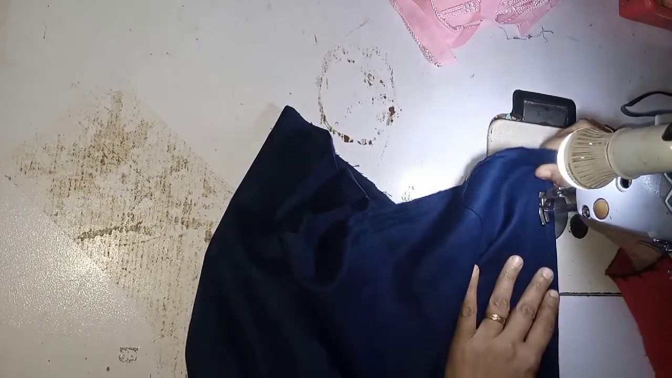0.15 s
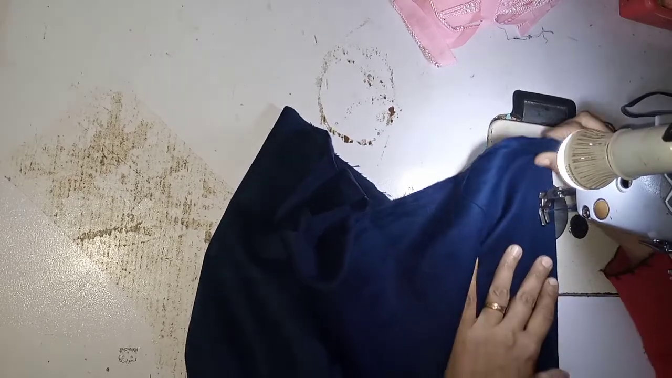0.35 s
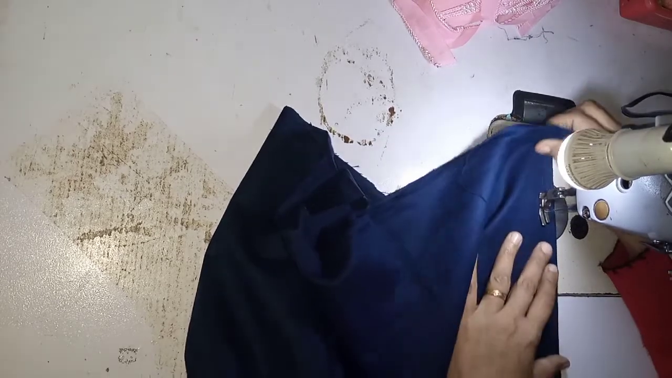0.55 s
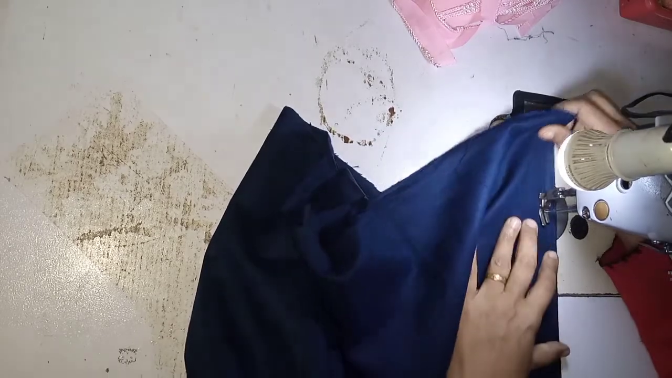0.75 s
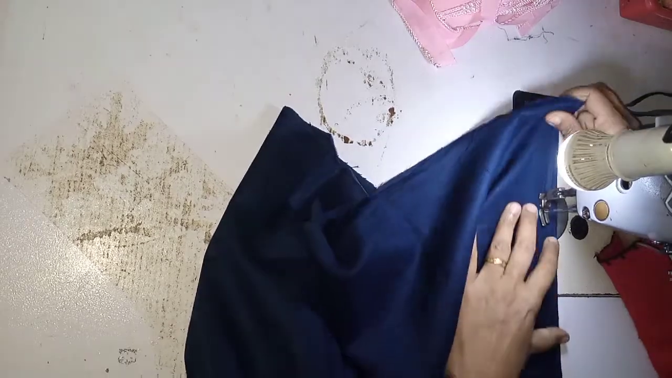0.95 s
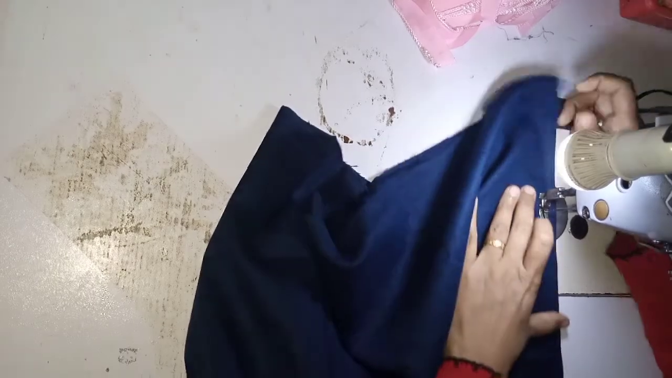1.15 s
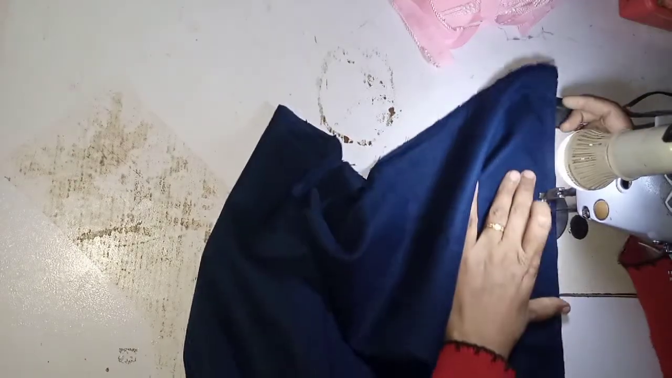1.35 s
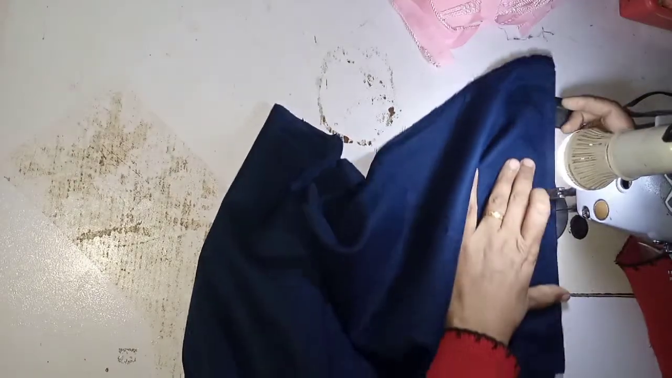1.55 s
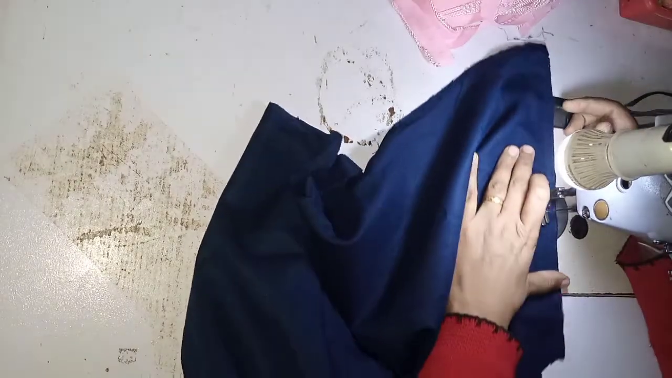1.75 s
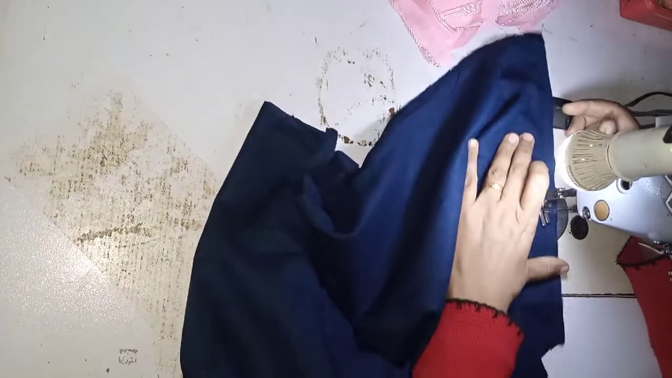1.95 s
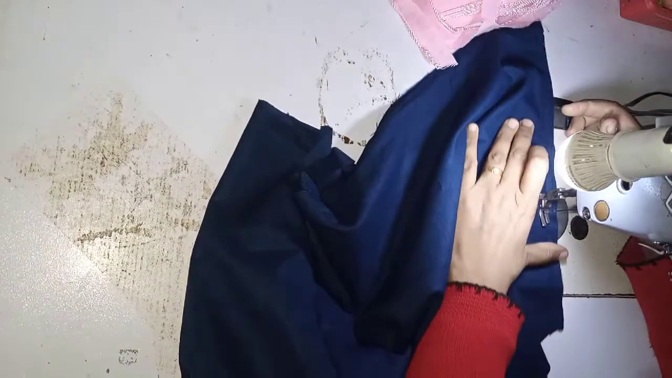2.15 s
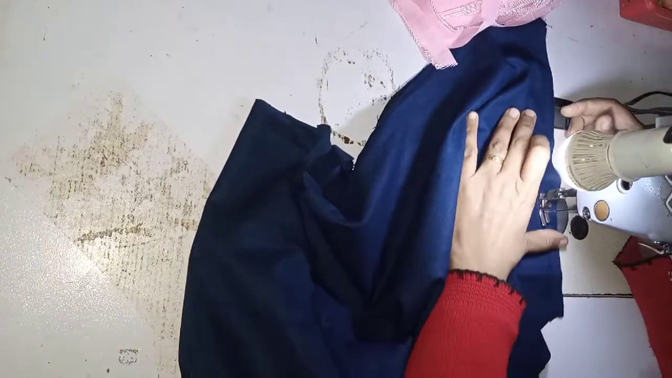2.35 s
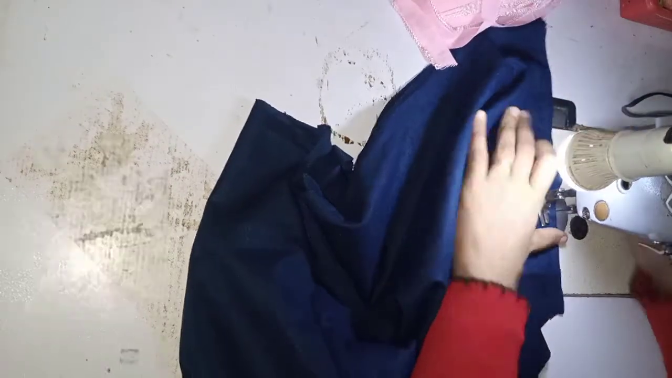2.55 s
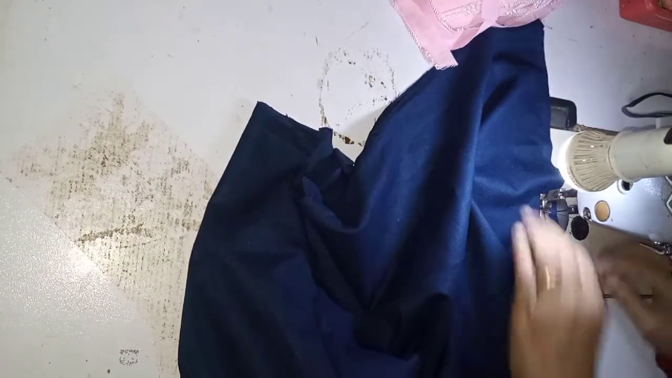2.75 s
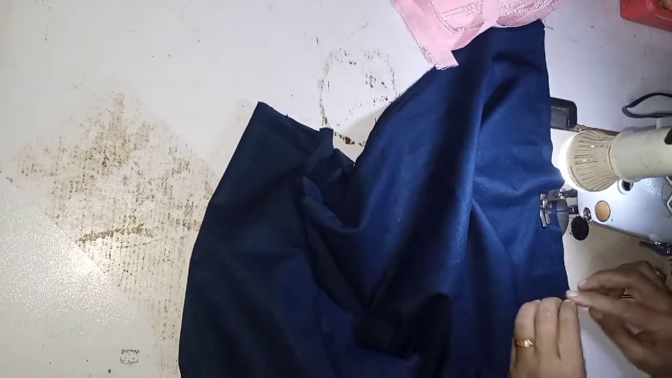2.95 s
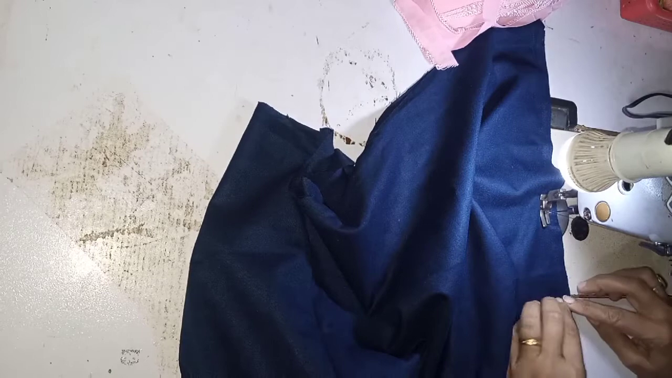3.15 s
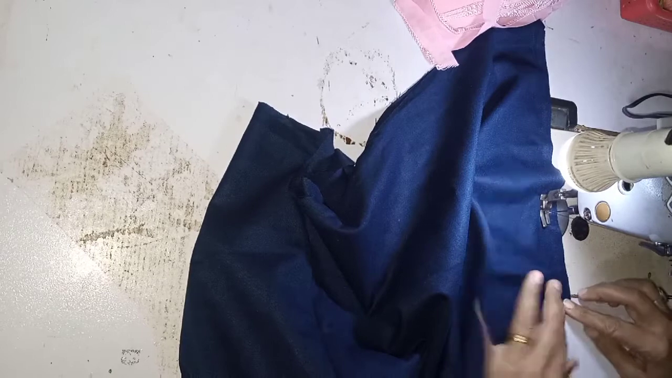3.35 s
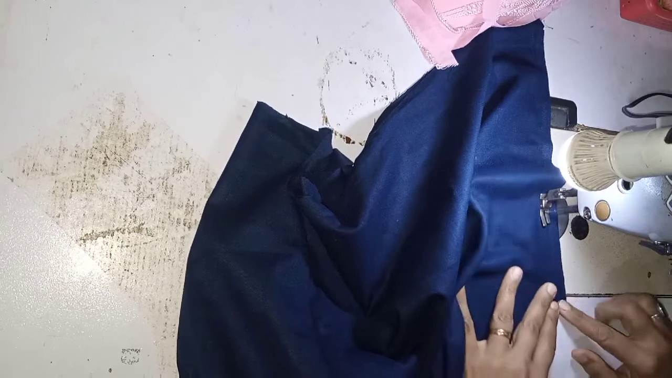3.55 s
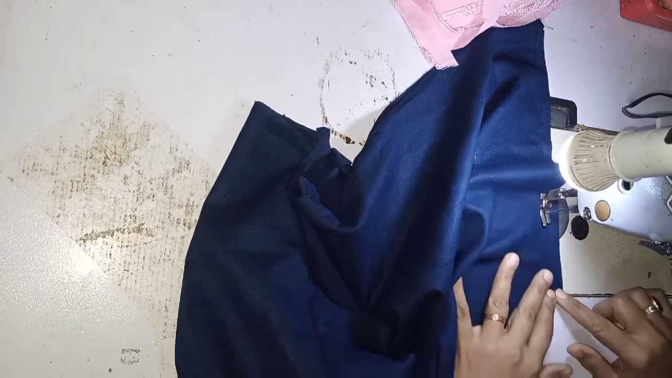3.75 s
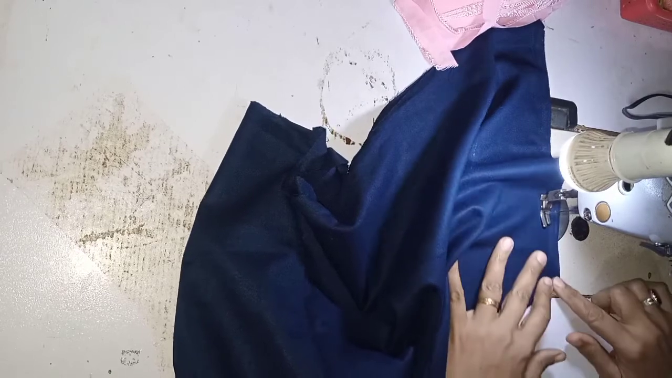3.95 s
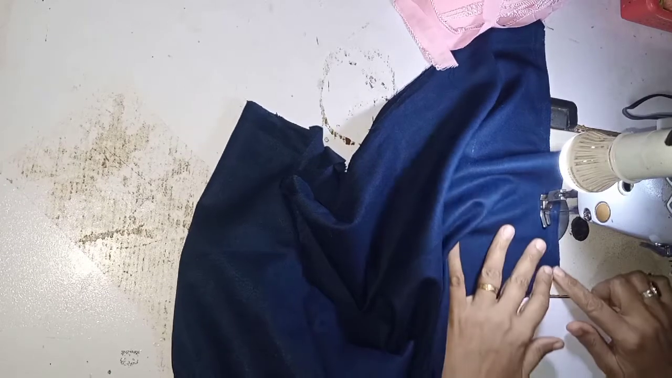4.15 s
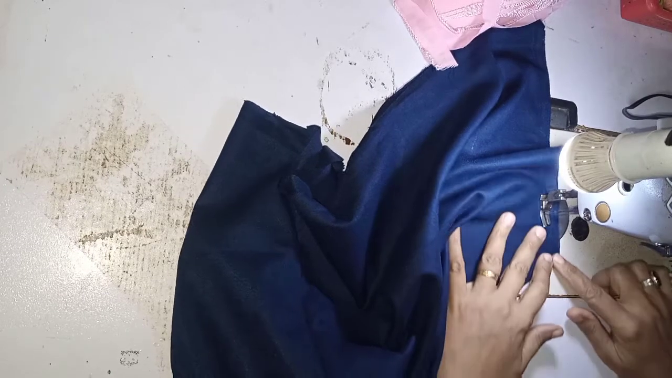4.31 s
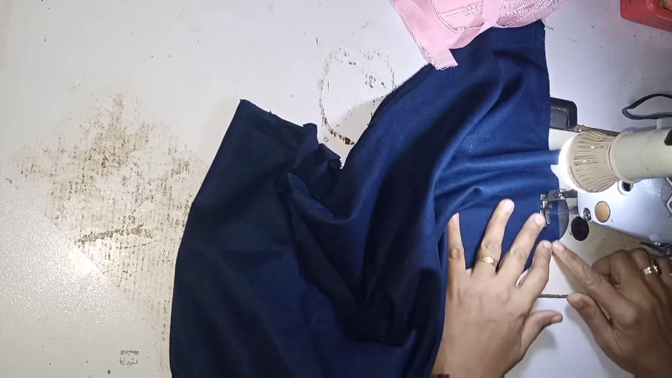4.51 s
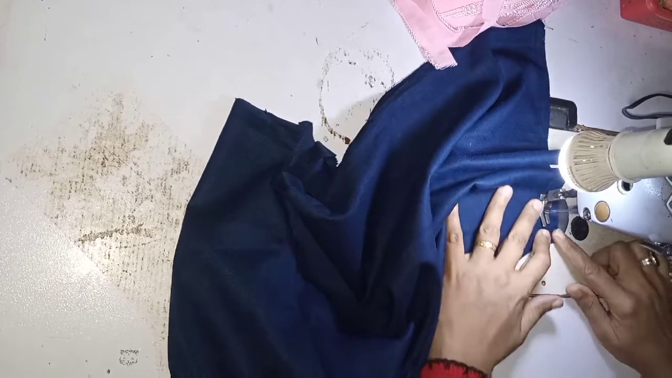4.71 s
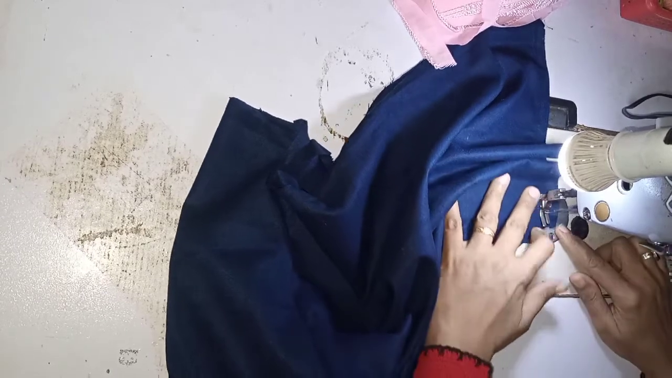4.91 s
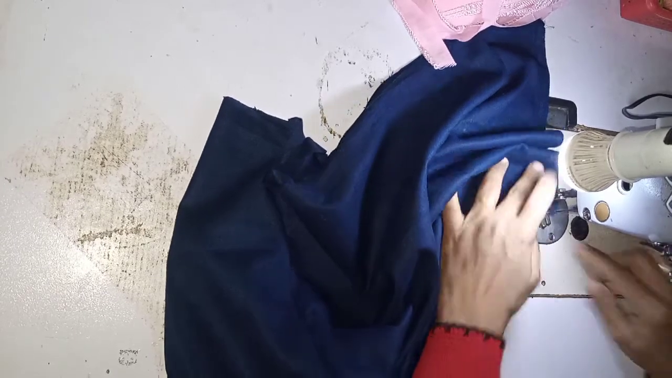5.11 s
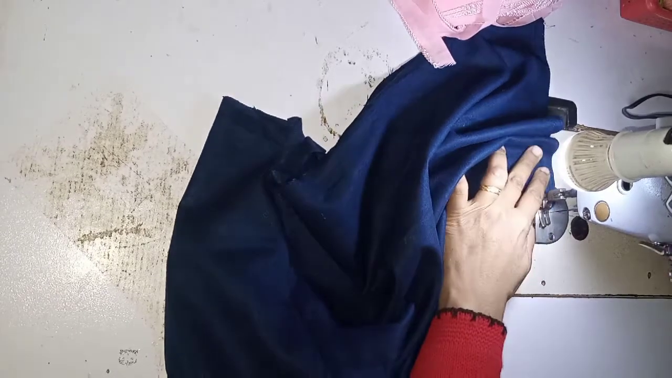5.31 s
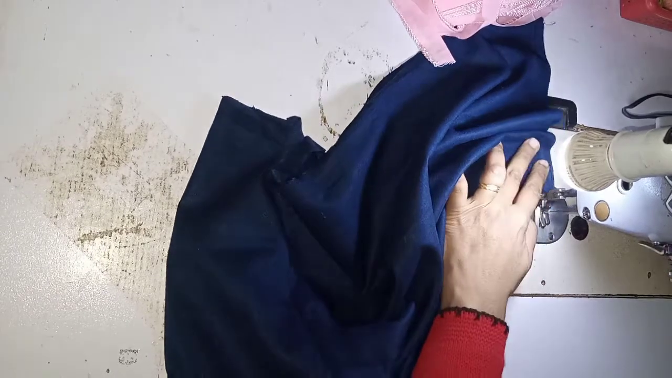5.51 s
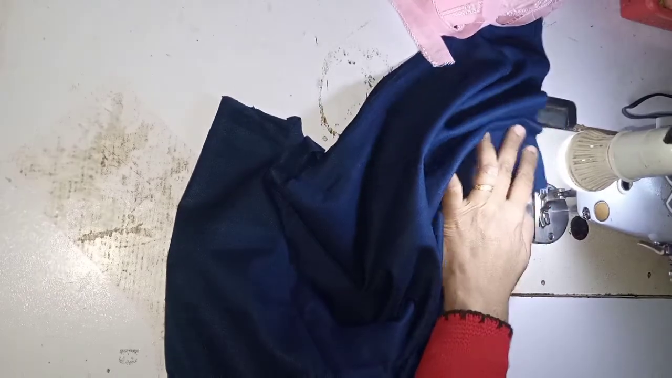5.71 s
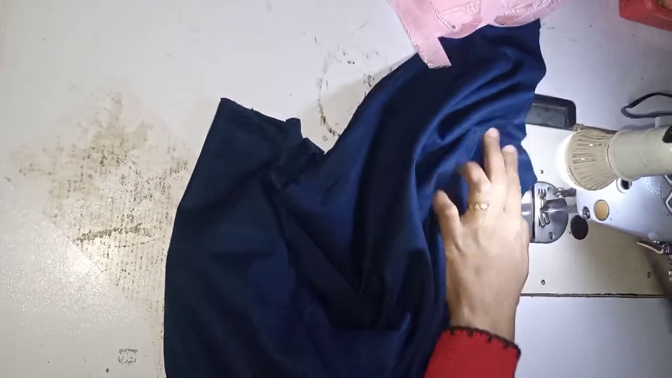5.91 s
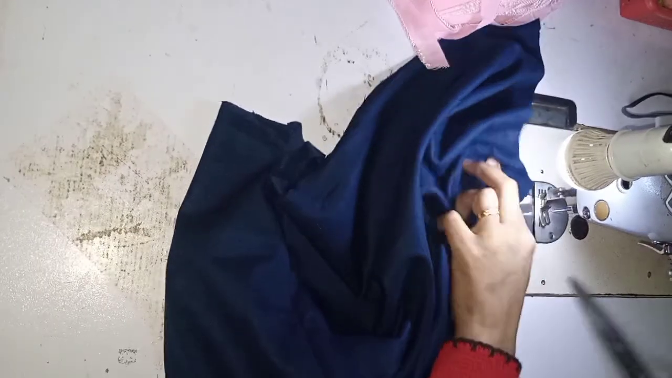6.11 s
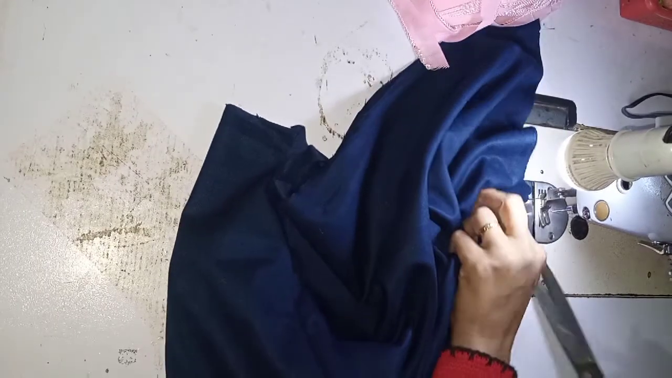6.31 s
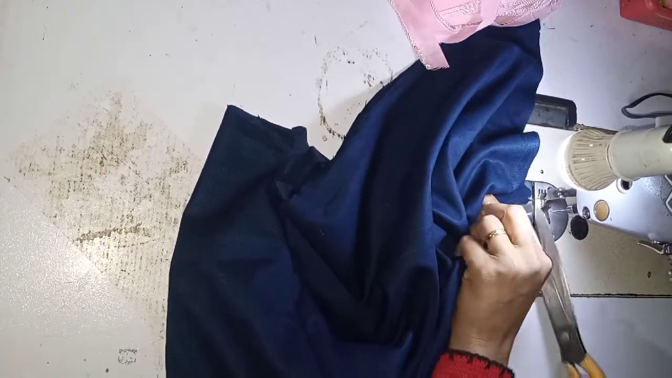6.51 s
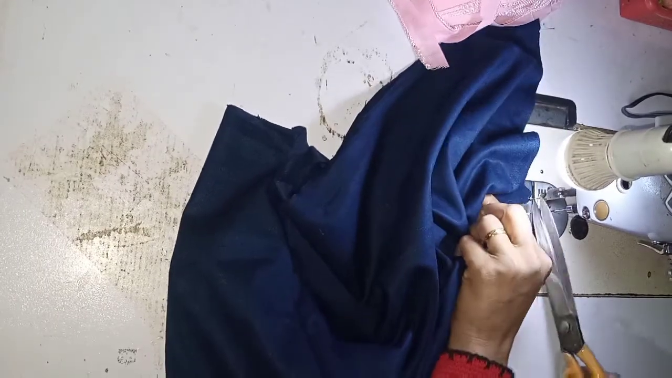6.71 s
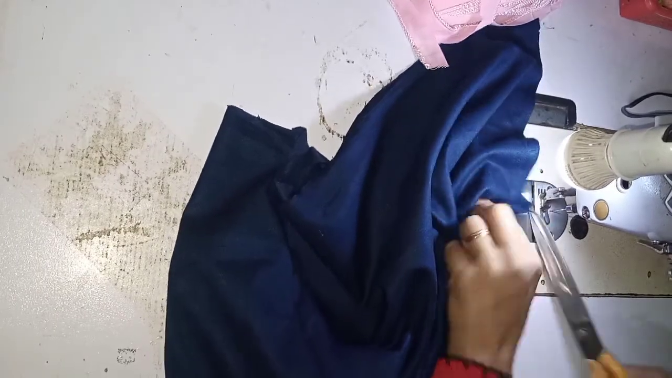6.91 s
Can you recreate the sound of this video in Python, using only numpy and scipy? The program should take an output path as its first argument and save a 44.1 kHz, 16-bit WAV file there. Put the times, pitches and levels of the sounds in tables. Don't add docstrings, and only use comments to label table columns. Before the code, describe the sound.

A close electric sewing machine in a small, quiet room. After soft bumps and a pedal click, its motor whines up and rattles through a seam of over two seconds, then coasts down with a clack. A brief pause with faint lever ticks, a second shorter seam, clicks, and a very short burst. Table knocks and ringing scissor taps end it. The microphone is near, sound dry, with a faint fan hum behind.

```python
import sys
import numpy as np
from scipy import signal
from scipy.io import wavfile

SR = 44100
rng = np.random.default_rng(int(sys.argv[2]) if len(sys.argv) > 2 else 0)


def gain_from_db(level_db):
    decades = np.asarray(level_db, float) / 20
    return 10 ** decades


def waveform_to_disk(signal):
    frames = np.transpose(np.atleast_2d(signal))
    scaled = np.clip(frames, -1, 1) * 32767
    samples = np.round(scaled).astype(np.int16)
    wavfile.write(sys.argv[1], SR, samples)


N = 311457

# (pedal down [s], pedal up [s], spin-up [s], drag of stiff cloth [teeth/s])
RUNS = [
    (.561, 2.87, .11, 35.3),
    (4.026, 5.71, .131, 13.4),
    (6.031, 6.42, .105, 16.2),
]
TOUCH_RISE_S = 0.0088


def rms_one(x):
    return x / np.sqrt(np.mean(x ** 2) + 1e-20)


def at_hz(points, hz):
    points = np.array(points)
    return np.interp(np.log(hz + 1), np.log(points[:, 0]), points[:, 1])


def drift(rate):
    r = np.exp(-80 * np.pi * rate / SR)
    slow = signal.lfilter([1], [1, -2 * r, r * r], rng.standard_normal(N // 40 + 2002))[2000:]
    return np.interp(np.arange(N) / 40, np.arange(len(slow)), rms_one(slow))


def filtered(x, order, hz, kind):
    return signal.sosfilt(signal.butter(order, hz, kind, fs=SR, output="sos"), x)


def resonance(x, hz, width_hz):
    r = np.exp(-np.pi * width_hz / SR)
    feedback = [1, -2 * r * np.cos(2 * np.pi * hz / SR), r * r]
    return signal.lfilter([(1 - r * r) / 2, 0, (r * r - 1) / 2], feedback, x)


def bands(spectrum, low_hz, high_hz, patchy_db, plates=(), shaken=1):
    corners = np.geomspace(low_hz, high_hz, round(3 * np.log2(high_hz / low_hz)) + 1)
    white, out = rng.standard_normal((3, 2, N)), 0
    for k, (low, high) in enumerate(zip(corners, corners[1:])):
        band = filtered(white[k % 2], 2, [low, high], "band")
        out = out + gain_from_db(at_hz(spectrum, np.sqrt(low * high)) + patchy_db * drift(28)) * band
    for hz, width_hz, db in plates:
        if low_hz < hz < high_hz:
            ring = resonance(resonance(white[2], hz, width_hz), hz, 2 * width_hz)
            out = out + shaken * gain_from_db(db + 0.84 * drift(16)) * ring
    return rms_one(out)


def room_tone():
    # (frequency [Hz], width [Hz], level [dB])
    fan = [
        (314.85, 16, -66.5),
        (640, 45, -85),
    ]
    # (frequency [Hz], density [dB per Hz])
    hiss = [(45, -20.5), (90, -2), (240, -3), (500, -12), (1000, -16.5), (2300, -19.5), (5800, -22.5),
            (9000, -31), (13500, -30.5)]
    hum = 0
    for hz, width_hz, db in fan:
        narrow = resonance(resonance(rng.standard_normal(N), hz, width_hz), hz, width_hz)
        hum = hum + gain_from_db(db) * rms_one(narrow)
    hum = hum + gain_from_db(-69) * np.sin(2 * np.pi * fan[0][0] * np.arange(N) / SR + 3.0 * drift(2.5))
    return gain_from_db(-77.5) * bands(hiss, 40, 13500, 0.94) + hum


def touch_power():
    # (table [dB], casing [dB], gears [dB], hook [dB])
    pedal_colour, cloth_colour = (-4.5, -0.5, -4.5, -5), (-30, -10, -7.5, -1.5)
    bump_colour, scrape_colour = (-1.5, -28, -32.5, -38.5), (-30, 2.5, 1, -0.5)
    # (time [s], hold [s], level [dB], t60 [s])
    pedal, cloth, bumps, scrapes = [(0.502, 0.0605, -49.5, .05), (3.995, 0.106, -44, .05),
                                    (5.965, 0.063, -52, 0.103)], [(0, 0.049, -68.5, 0.29), (.336, 0.0098, -71.5, 0.19),
                                                   (3.354, 0.0063, -60.5, 0.059), (3.365, .01, -72, 0.305),
                                                   (6.942, .12, -52.5, .2)], [(0, 0.0104, -42.5, 0.154),
                                                                  (.3, 0.051, -56, 0.23),
                                                                  (.44, 0.065, -58, .1),
                                                                  (3.2, 0.163, -52.5, 0.265),
                                                                  (3.5, .45, -70.5, .2),
                                                                  (6.05, 0.396, -27, 0.214),
                                                                  (6.55, 0.06, -34, 1),
                                                                  (6.709, 0.035, -32.5, 0.51),
                                                                  (6.83, 0.12, -39, 0.224),
                                                                  (6.94, 0.102, -42.5, .2)], [(6.52, 0.0152, -39, 0.15),
                                                                                 (6.729, 0.0362, -55, .25),
                                                                                 (6.838, 0.0081, -59, 0.065),
                                                                                 (6.9, 0.025, -63, .1),
                                                                                 (6.942, .12, -59, .2)]
    # (from [s], until [s], level [dB])
    cloth_push = (3.782, 4.0, -73.5)
    t, out = np.arange(N) / SR, np.zeros((4, N))
    kinds = [(pedal_colour, pedal), (cloth_colour, cloth), (bump_colour, bumps), (scrape_colour, scrapes)]
    for colour_db, rows in kinds:
        for s, hold, db, t60 in rows:
            rise = np.clip((t - s) / TOUCH_RISE_S, 0, 1)
            gain = rise * gain_from_db(db - 60 * np.maximum(t - s - hold, 0) / max(t60, .01))
            out += np.outer(gain_from_db(colour_db), gain) ** 2
    s, until, db = cloth_push
    slide = (t < until) * gain_from_db(db) * (1 - np.exp(-np.maximum(t - s, 0) / .07))
    return out + np.outer(gain_from_db(cloth_colour), slide) ** 2


def rough_rings(modes):
    out, t = np.zeros((2, N + SR // 2)), np.arange(SR // 2) / SR
    for s, hz, width_hz, db, t60 in modes:
        noise = rng.standard_normal((2, SR))
        rough = resonance(resonance(noise, hz, width_hz), hz, 2 * width_hz)[:, -len(t):]
        fall = gain_from_db(db - 60 * t / t60) * np.minimum(t / 0.00165, 1)
        start = round(s * SR)
        out[:, start:start + len(t)] += fall * rms_one(rough)
    return out[:, :N]


def shudders():
    return rough_rings([(0, 101, 20.2, -34.5, 0.21), (.11, 107.5, 32.5, -52, 0.17),
                        (0.576, 104.9, 27, -41, 0.36), (3.2, 131, 30, -53, 0.61),
                        (2.92, 640, 38, -35.5, 0.42), (2.92, 457, 65, -39, 0.326),
                        (2.98, 220.8, 6.9, -35.5, 0.4), (5.732, 220.5, 6.7, -35, 0.51),
                        (5.9, 613, 157, -53, 0.99), (6.42, 222.7, 5.8, -35.5, 1)])


def metal_rings():
    # (time [s], modes of (frequency [Hz], width [Hz], level [dB], t60 [s]))
    lever = [
        (.335, [(7300, 60, -75, .15)]),
        (3.355, [(5900, 60, -67.5, 0.29), (7350, 200, -72, .12), (8700, 150, -67.5, 0.15), (10980, 310, -68, 0.11)]),
    ]
    pedal = [
        (.515, [(2457, 62, -55, 0.32), (2737, 42, -55, 0.32)]),
        (.573, [(1230, 410, -42, 0.09), (3300, 400, -47, 0.075)]),
        (4.0, [(674, 124, -65, 0.23)]),
        (4.05, [(1950, 270, -36.5, 0.29)]),
    ]
    stop = [
        (3.1, [(1950, 79, -52, 0.29), (790, 260, -54.5, 0.57), (5740, 200, -67.5, 0.56)]),
        (3.15, [(4600, 155, -61.5, 0.233), (3580, 115, -66, 0.36)]),
        (6.504, [(2460, 17, -36.5, 0.38)]),
        (6.57, [(1920, 38, -49, 0.34)]),
        (6.65, [(6550, 230, -54, 0.27)]),
    ]
    scissors = [
        (6.752, [(5250, 82, -52, 0.106)]),
        (6.91, [(1785, 174, -53.5, 0.216)]),
        (6.943, [(800, 236, -45.5, 0.206), (6120, 160, -49, 0.65), (7100, 480, -49.5, 0.75)]),
        (6.96, [(1860, 146, -53, 0.79), (8630, 300, -53, 0.36)]),
        (6.99, [(3748, 92, -60, 0.76)]),
    ]
    return rough_rings([(s, *mode) for s, modes in pedal + stop + lever + scissors for mode in modes])


def clicks():
    # (time [s], crack peak [dB], thud [dB], t60 [s])
    strikes = [(0.3344, -67.5, -71, 0.02), (0.5122, -43, -59, 0.02), (0.5709, -25, -30.5, 0.022),
               (3.025, -22.5, -50.5, 0.038), (3.102, -37, -52.5, 0.031), (3.3535, -50, -62.5, 0.019),
               (3.4194, -72, -71.5, 0.02), (3.999, -30.5, -57, 0.019), (4.049, -26, -22.5, 0.043),
               (5.875, -26.5, -51.5, 0.034), (5.94, -32.5, -57, 0.0308), (6.0281, -22.5, -26, 0.0185),
               (6.44, -30, -41.5, .025), (6.53, -41.5, -51, .03), (6.6, -37, -46, 0.031),
               (6.7004, -42, -44, 0.023), (6.835, -41, -47.5, 0.0196), (6.901, -46, -58, 0.019),
               (6.9413, -29, -46, 0.0226)]
    out, t = np.zeros((2, N + SR // 2)), np.arange(SR // 2) / SR
    for s, db, thud_db, t60 in strikes:
        noise = rng.standard_normal((2, len(t))) * gain_from_db(-60 * t / max(t60, .004))
        crack = gain_from_db(db - 7) * filtered(noise, 2, [1200, 9500], "band")
        knock = gain_from_db(thud_db + 8.0) * filtered(noise, 2, [250, 1200], "band")
        start = round(s * SR)
        out[:, start:start + len(t)] += crack + knock
    return out[:, :N]


def belt_speed():
    free_hz, drag_eases_s = 259.8, 1.17
    coast_s, friction_hz, rest_hz = .68, 300, 5
    t, out = np.arange(N) / SR, np.full(N, float(rest_hz))
    for down, up, spin_s, drag_hz in RUNS:
        on = np.clip(t, down, up) - down
        driven = (free_hz - drag_hz * np.exp(-on / drag_eases_s)) * (1 - np.exp(-on / spin_s))
        coasting = np.exp(-np.maximum(t - up, 0) / coast_s)
        out = np.maximum(out, (driven + friction_hz) * coasting - friction_hz)
    return out


def run_gain(full_db, short_db, rise_s, fall_db, linger_s):
    engage_s = [.575, 4.048, 6.0322]
    pressure_db = [0.0928, 0.6476, 0.8]
    warming_db, warming_s = 2, 1.4
    t, out = np.arange(N) / SR, np.zeros(N)
    for start, run, db in zip(engage_s, RUNS, pressure_db):
        on, off = np.maximum(t - start, 0), np.maximum(t - run[1], 0)
        level = full_db + db - short_db * np.exp(-on / rise_s) - warming_db * np.exp(-on / warming_s)
        fall = fall_db * (np.hypot(off, linger_s) - abs(linger_s))
        out = np.maximum(out, np.minimum(on / TOUCH_RISE_S, 1) * gain_from_db(level - fall))
    return out


def zone_gains(teeth_hz):
    # (full [dB], short at engaging [dB], rise [s], fall [dB/s], lingers [s])
    zone_runs = [
        (-30, 8, 0.033, 65, 0.017),
        (-27.5, 11, 0.0583, 134, 0.115),
        (-31, 20, 0.078, 128, 0.0473),
        (-27, 19.5, 0.0882, 136, 0.0266),
    ]
    critical = {0: [(141, 13, 5), (216, 29, -4.5)], 1: [(208.8, 28, 5)]}
    running = np.array([run_gain(*rule) for rule in zone_runs])
    for zone, speeds in critical.items():
        running[zone] *= gain_from_db(sum(db * np.exp(-((teeth_hz - hz) / width) ** 2) for hz, width, db in speeds))
    running[0] *= gain_from_db(2.5 * drift(1.4))
    return np.sqrt(running ** 2 + touch_power())


def rattle(teeth_hz):
    split_hz = [30, 450, 1700, 4500, 14000]
    noisy_share_db = [-9, -5, -0.5244, 0.3323]
    # (frequency [Hz], density [dB per Hz])
    machine_colour = [(30, -41.5), (60, -17), (110, -6), (220, -12.5), (480, -16.5), (900, -8),
                      (1350, -10.5), (1700, -21), (2200, -15.5), (3400, -14.5), (4600, -19), (6500, -10),
                      (8500, -24), (13000, -33)]
    # (frequency [Hz], width [Hz], density [dB per Hz])
    metal_plates = [(906, 35, -2.5), (1366.5, 164, -1), (1752, 130, -11), (1950, 25, -5), (2596, 95, -8.5),
                    (2909.5, 66, -5.5), (4214, 130, -12), (4915, 60, -9.5), (5100.6, 62, -3),
                    (6574, 220, -11.5)]
    # (frequency [Hz], density [dB per Hz])
    rustle_colour = [(7000, -1), (13500, -7)]
    contacts_per_tooth, contact_s, smooth_share = 3.0, 0.00047, 0.774
    tooth = 2 * np.pi * np.cumsum(teeth_hz) / SR
    swell = gain_from_db(0.753 * drift(18) + 0.38 * drift(30) + .5 * np.sin(tooth))

    per_sample = contacts_per_tooth * (teeth_hz + 150) / SR
    fade = np.exp(-1 / (contact_s * SR))
    power = (rng.random(N) < per_sample) * rng.exponential(1, N) / per_sample
    contacts = signal.lfilter([1 - fade], [1, -fade], power + 1e-18)
    grain = np.sqrt(smooth_share + (1 - smooth_share) * contacts)

    shaken = (teeth_hz / teeth_hz.max()) ** 0.52
    gains = zone_gains(teeth_hz)
    zones = []
    for gain, share, low, high in zip(gains, noisy_share_db, split_hz, split_hz[1:]):
        zones.append(gain * gain_from_db(share) * bands(machine_colour, low, high, .9, metal_plates, shaken))
    table, *metal = zones
    table = shaken * table + (1 - shaken) * filtered(table, 2, 97, "high")
    rustle = (1 - shaken) * gains[-1] * gain_from_db(-4.5) * bands(rustle_colour, 5900, 13500, 3.0)
    return swell * (table + grain * (sum(metal) + rustle))


def lines(orders, body, teeth_hz, wobble_db):
    turn, out = 2 * np.pi * np.cumsum(teeth_hz) / SR + .05 * drift(5), 0
    coarse = teeth_hz[::32]
    for (multiple, db), start in zip(orders, rng.uniform(0, 2 * np.pi, len(orders))):
        level = gain_from_db(db + at_hz(body, multiple * coarse) + wobble_db * drift(7)[::32])
        out = out + np.repeat(level, 32)[:N] * np.sin(multiple * turn + start)
    return np.sqrt(2) * out


def drive(teeth_hz):
    # (multiple [of tooth rate], level [dB])
    whine_lines = [(1, 0), (2, 0), (2.768, -9), (3, -2), (3.234, -15), (3.392, -13), (3.6, -24),
                   (3.858, -13), (4, 0), (4.098, -11), (4.4, -9), (4.6, -14), (4.858, -12), (5, 2),
                   (5.092, -7), (5.142, -9), (5.234, -1.5), (5.4, -7), (5.6, -11), (5.766, -5), (6, 0),
                   (6.77, -6), (7, 0), (7.18, 2), (8, 0)]
    # (multiple [of tooth rate], level [dB])
    pulley_line = [(3.762, 0)]
    # (frequency [Hz], level [dB])
    casing_body, bed_body, table_body = [(100, -5.5), (250, -31.5), (500, -30.5), (700, -19.5), (760, -9),
                                         (830, -10), (890, -8), (1010, -1.5), (1130, -9.5), (1300, -1),
                                         (1420, -4.5), (1530, -11), (1750, -24), (2100, -24)], [(760, -21.5), (830, -3), (890, 2), (925, -7.5),
                                                         (970, -27.5)], [(25, -45), (55, -16), (82, -16),
                                                                      (106, 0), (136, 0), (163, -12),
                                                                      (190, -11), (218, -7), (270, -6),
                                                                      (330, -9), (360, -16), (470, -19)]
    # (frequency [Hz], width [Hz], level [dB])
    body_rings = [
        (217.33, 3.8, 36),
        (864.7, 14, 4),
        (1333.8, 27, -11),
    ]
    # (full [dB], short at engaging [dB], rise [s], fall [dB/s], lingers [s])
    whine_run, thud_run = (-30, 48, .085, 280, .04), (-42.5, 25, 0.0017, 106.5, 0.04)
    teeth_per_stitch = 9.22
    whine_gain = run_gain(*whine_run)
    whine = whine_gain * lines(whine_lines, casing_body, teeth_hz, wobble_db=1.0)
    stitch = [(k / teeth_per_stitch, 0) for k in range(2, 17)]
    thuds = run_gain(*thud_run) * lines(stitch, table_body, teeth_hz, wobble_db=4.0)
    pulley = whine_gain * lines(pulley_line, bed_body, teeth_hz, wobble_db=1.5)
    ringing = sum(gain_from_db(db) * resonance(whine, hz, width_hz) for hz, width_hz, db in body_rings)
    return whine + pulley + thuds + ringing


def scene():
    side_cut_hz, side_db, side_treble_db = 4650, -4.6, -24
    teeth_hz = belt_speed()
    mid, side = room_tone() + shudders() + clicks() + metal_rings() + rattle(teeth_hz)
    side = side + gain_from_db(side_treble_db) * filtered(side, 2, 8000, "high")
    side_cut = signal.cheby2(10, 70, .76 * side_cut_hz, "high", fs=SR, output="sos")
    side = gain_from_db(side_db) * signal.sosfilt(side_cut, side)
    mid = mid + drive(teeth_hz)
    return np.array([mid + side, mid - side])


def roll_off(x):
    return signal.sosfilt(signal.butter(12, 13880, fs=SR, output="sos"), x)


def record(dry):
    mix = filtered(dry, 1, 45, "high")
    mix = signal.sosfilt(signal.ellip(10, .5, 80, 13120, fs=SR, output="sos"), mix)
    return roll_off(mix)


dry = scene()
out = record(dry)
waveform_to_disk(out)
```